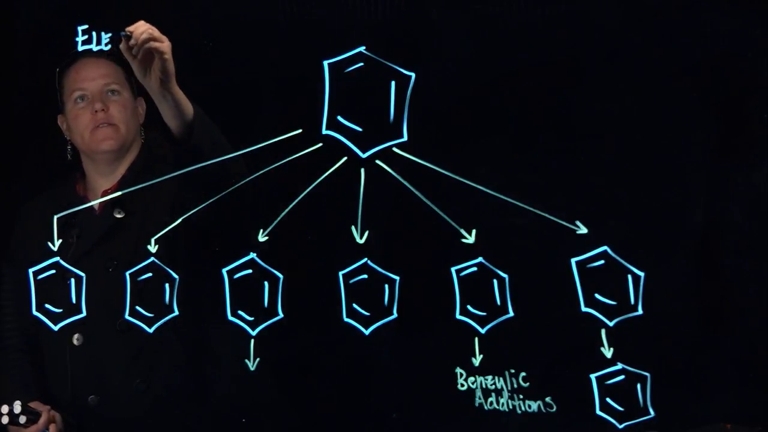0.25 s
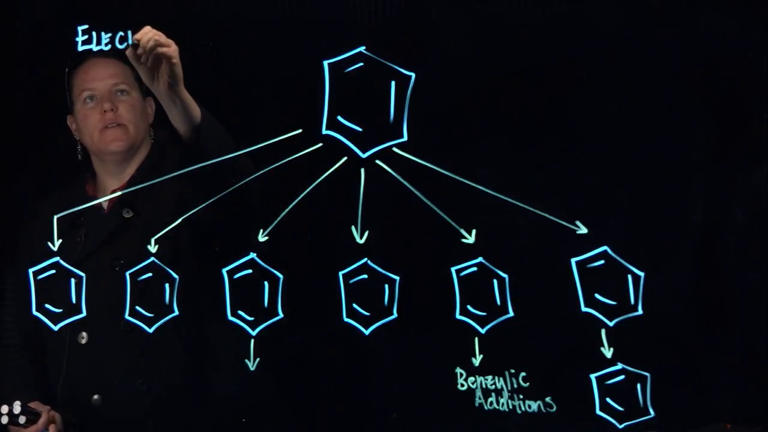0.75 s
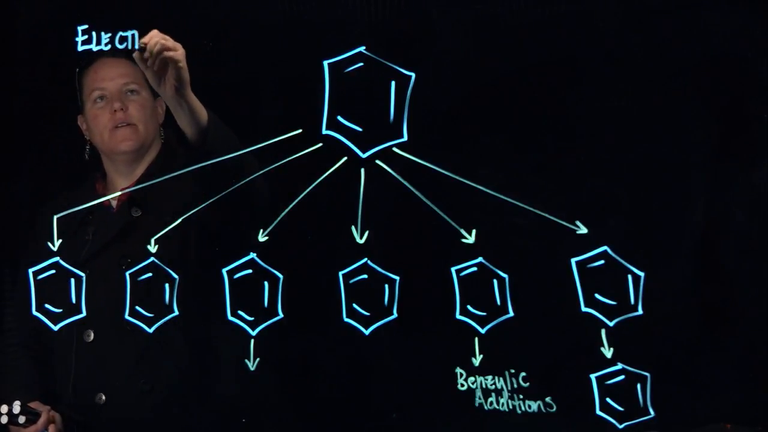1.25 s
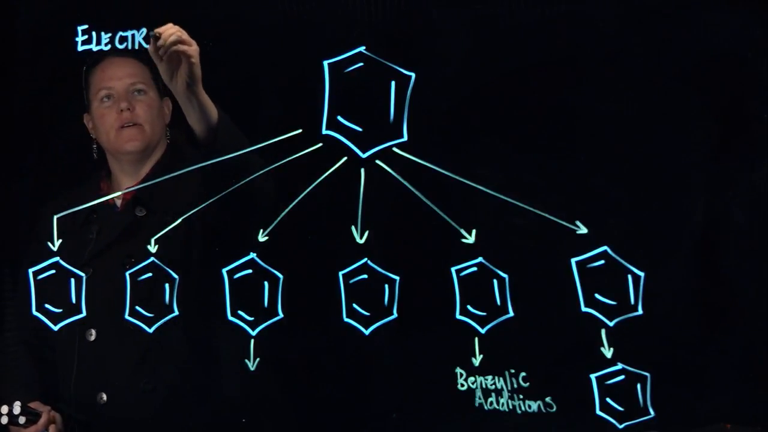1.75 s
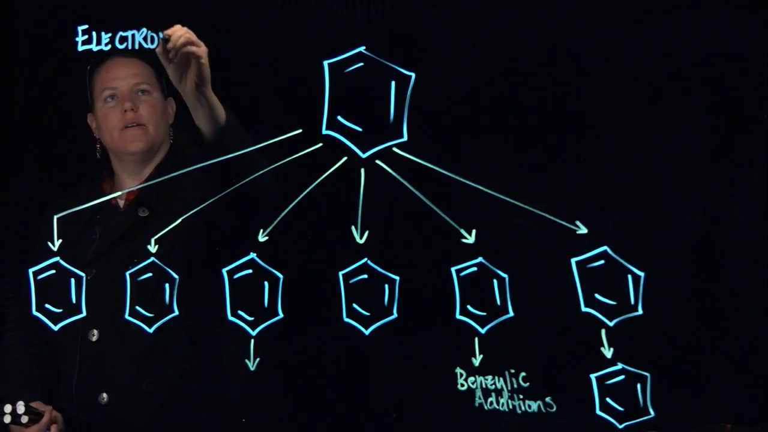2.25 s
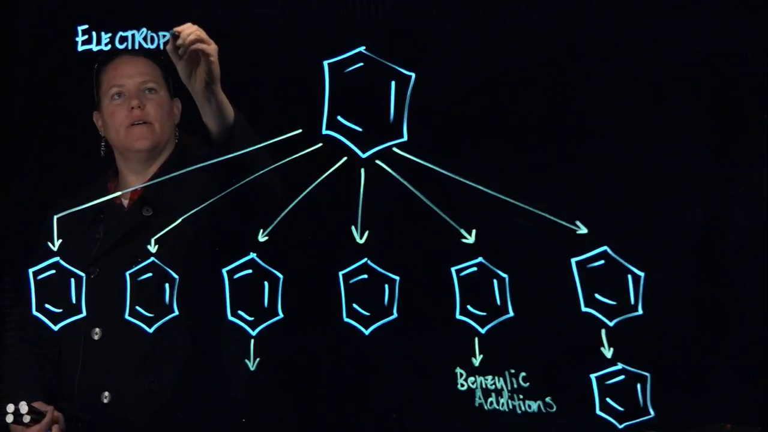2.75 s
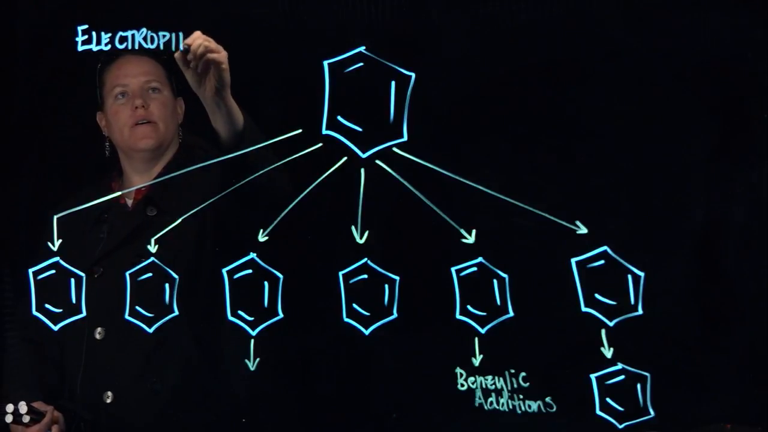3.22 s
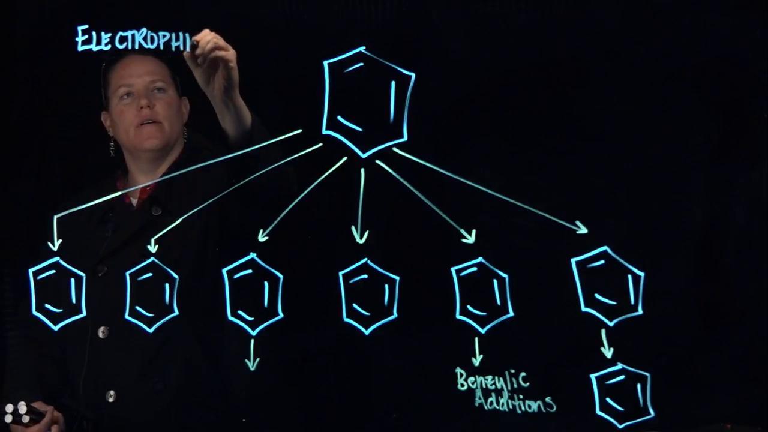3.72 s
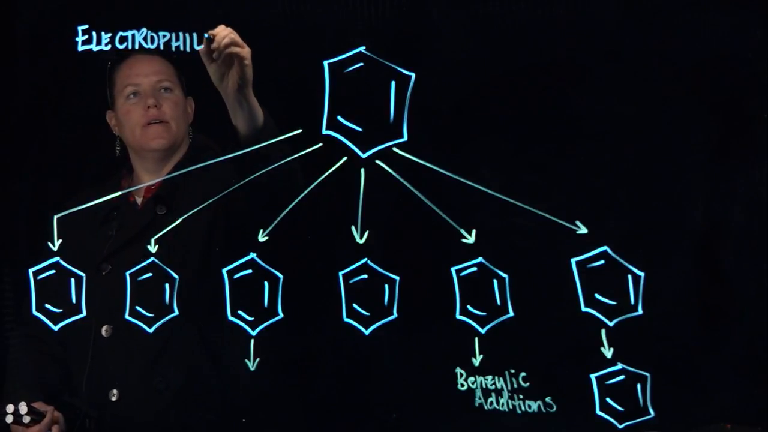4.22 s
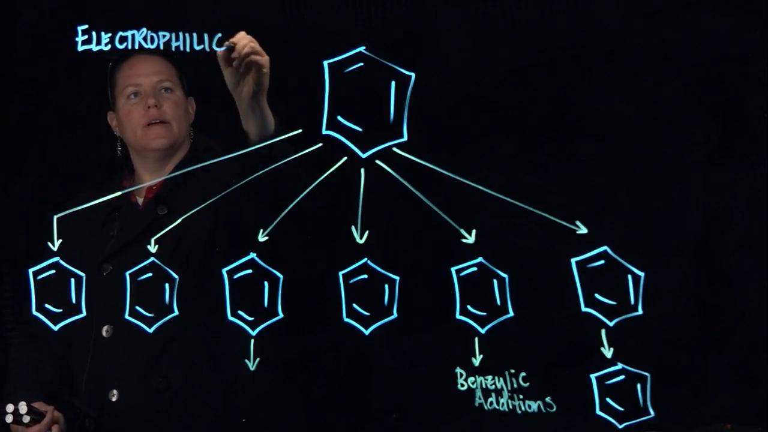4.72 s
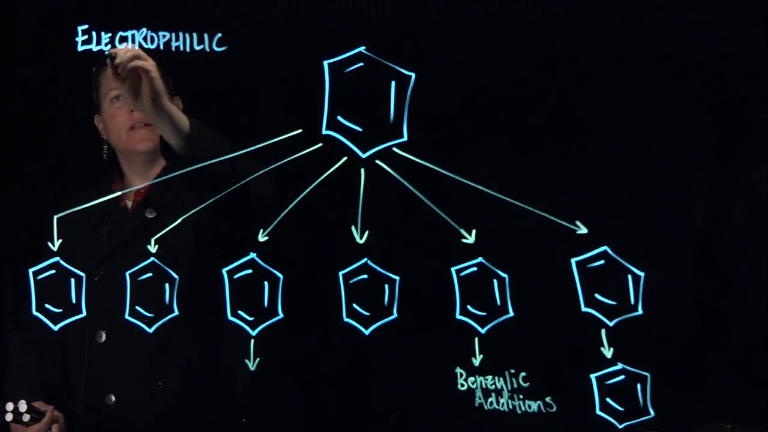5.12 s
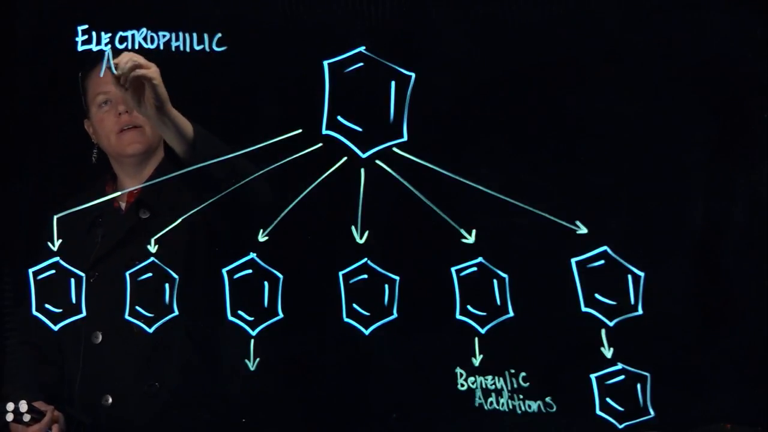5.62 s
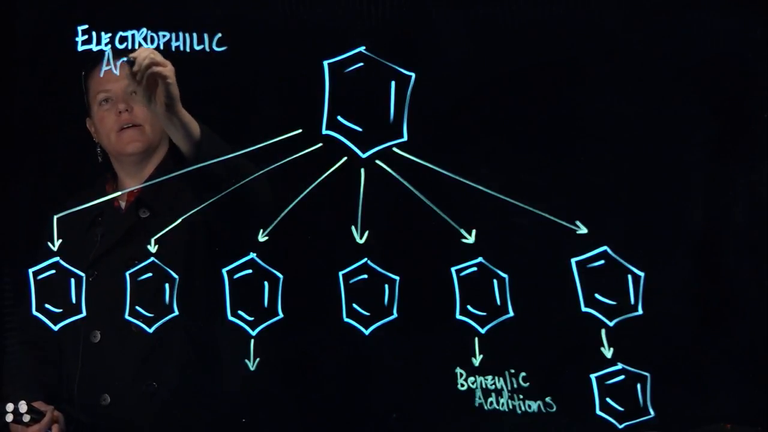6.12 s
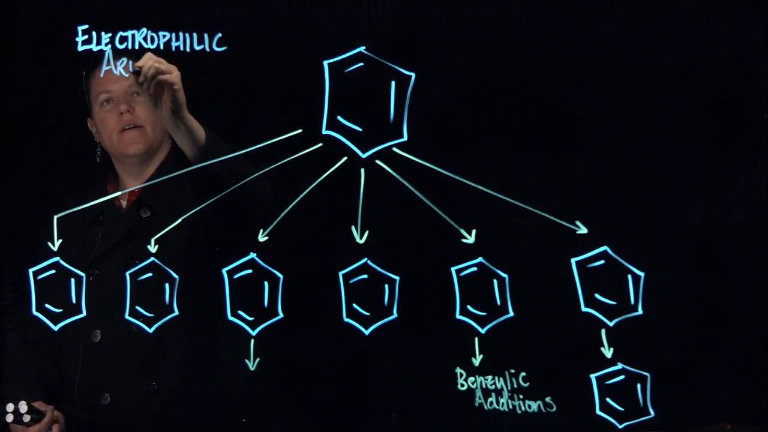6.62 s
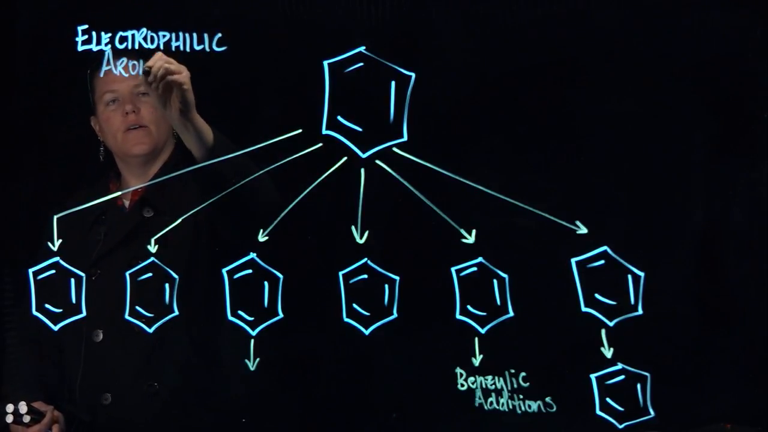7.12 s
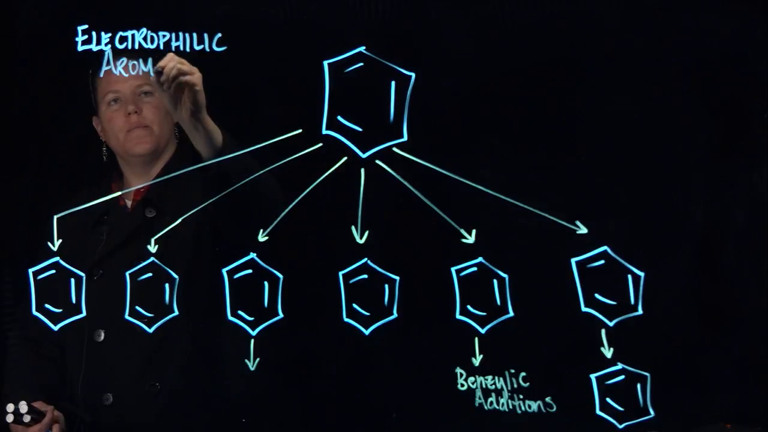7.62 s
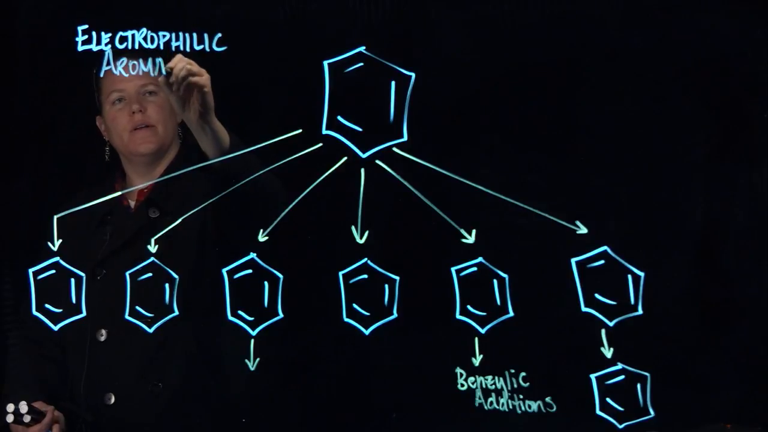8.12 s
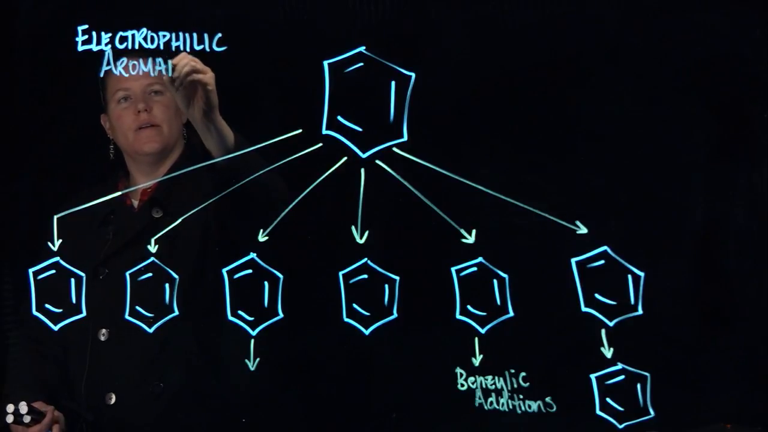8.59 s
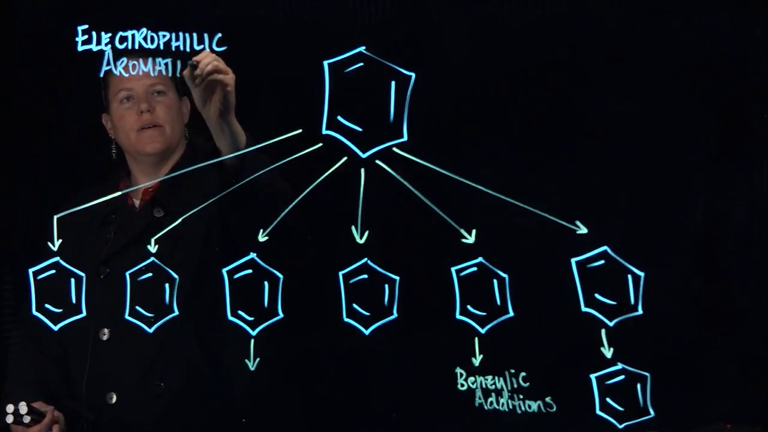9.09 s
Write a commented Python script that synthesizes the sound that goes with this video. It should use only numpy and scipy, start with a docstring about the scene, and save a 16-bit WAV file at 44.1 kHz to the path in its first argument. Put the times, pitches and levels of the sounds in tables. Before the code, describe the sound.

A low ventilation hum with deep rumble and faint air hiss runs throughout, swelling gently and somewhat stronger in the second half. Close by, in a small damped room, a felt marker writes on glass. A light tick at 0.1 s is followed by a soft squeak at 0.5 s with a faint sleeve rustle, then quiet taps and rubs. Two short squeaks chirp around 1.9-2.0 s. Soft brushing strokes follow, with crisp ticks at 3.4 and 3.6 s. At 4.6 s a squeak swells loudly; between 5.2 and 5.4 s come the loudest, very high, piercing squeals, breaking briefly into a rougher, lower chirp. A weaker squeak follows at 5.5 s. Ticks and rubs continue, squeaking again at 6.7-6.8 and 7.4 s. Scratchy strokes grow denser, with a clear tick and tiny squeak near 8.7 s, ending on quick rubs around 9.3 s.

```python
"""A felt marker writes capital letters on a glass board, heard close in a small, damped room.
The felt rubs with a soft hiss that stirs the nib's resonance; on some strokes the nib sticks, slips and squeaks,
mostly near 4 or 9 kHz, with half-order lines where the slips are uneven. Landings tick: pen modes, felt crack
and a knock on the pane. A sleeve rustles as shaped noise. Behind it all the ventilation hums, rumbles and
hisses as coloured noise, over a faint whine; the room adds a weak tail and the recorder cuts the top."""
import sys
import numpy as np
from scipy import signal
from scipy.fft import rfft, irfft
from scipy.io import wavfile
from scipy.ndimage import map_coordinates

SR = 44100
rng = np.random.default_rng(int(sys.argv[2]) if len(sys.argv) > 2 else 0)


def to_wav(s):
    """Save 16-bit WAV."""
    ch = np.atleast_2d(s).T  # columns
    pcm = np.round(np.clip(ch, -1, 1) * 32767)  # PCM
    wavfile.write(sys.argv[1], SR, pcm.astype(np.int16))


N = 412335
T = np.arange(N) / SR
FREQS = np.maximum(np.arange(N // 2 + 1) * SR / N, 1)  # Hz, kept above zero for the logarithm


def undb(db):
    """Decibels to gain."""
    return 10 ** (np.asarray(db) / 20)


def unit(x):
    """Scale to rms 1."""
    return x / np.sqrt(np.mean(x ** 2) + 1e-20)


def noise(colour, modes=()):
    """Noise of rms 1 with a (f/Hz, level/dB) colour, lifted at some resonances."""
    hz, db = np.transpose(colour)
    shape_db = np.interp(np.log(FREQS), np.log(hz), db)
    for centre_hz, width_hz, lift_db in modes:
        shape_db = shape_db + lift_db / (1 + (2 * (FREQS - centre_hz) / width_hz) ** 2)
    spectrum = rfft(rng.standard_normal(N)) * undb(shape_db)
    return unit(irfft(spectrum, N))


def walk(rate_hz, size):
    """Random wander of spread about 1 that takes a new value rate_hz times a second."""
    place = np.arange(size) * rate_hz / SR
    values = rng.standard_normal(size // 4 + 8)
    # straight lines between the values narrow the spread; the root restores it
    return map_coordinates(values, [place], order=1, mode="wrap") * np.sqrt(3 / 2)


def span(start, end):
    """Times of the samples between two moments, at least two of them."""
    first = int(start * SR)
    return np.arange(first, max(int(end * SR), first + 2)) / SR


def fade(t, edge_s):
    """Gate with rounded ends."""
    to_nearest_end = np.minimum(t - t[0], t[-1] - t)
    return np.sin(np.pi / 2 * np.clip(to_nearest_end / edge_s, 0, 1))


def add(out, start, sound):
    """Mix a sound in at a time."""
    i = max(int(start * SR), 0)
    out[i:i + len(sound)] += sound[:max(N - i, 0)]


# Colour of the duct hum before the room modes lift it: f/Hz, relative level/dB
HUM_COLOUR = [(60, -11), (95, -7), (135, -3), (200, -8.5), (310, -23), (460, -20.5), (620, -28),
              (1000, -34.5), (1500, -38), (2600, -48.5), (6000, -69.5)]
# Low modes of the small room: f/Hz, width/Hz, lift/dB
LOW_MODES = [(101, 4.2, 4.5), (132.3, 19, 8), (145.8, 15, -5.5), (167.4, 5.7, 8), (218, 6.5, 3),
             (255.3, 8.8, 7), (392, 12, 6.5), (459, 5.5, 3), (474.6, 16, 4.5)]
# Colour of the rumble under the hum: f/Hz, relative level/dB
RUMBLE_COLOUR = [(15, -5), (33, 4.5), (46, -5), (64, 3), (88, -11), (130, -20.5), (250, -33), (1000, -73.5)]
# Colour of the thin air hiss: f/Hz, relative level/dB
AIR_COLOUR = [(1000, -11), (3000, 3), (6000, 1), (10000, -0.5), (15500, -1)]
# Slow swells of the hum: t/s, rms level/dB
HUM_SWELLS = [(0.0, -32), (0.6, -33.5), (0.84, -40), (1.26, -35.5), (1.44, -36.5), (1.56, -34),
              (1.8, -37.5), (1.98, -34), (3.19, -36.0), (4.21, -31), (4.51, -35.5), (4.63, -29.5),
              (5.36, -28.5), (5.6, -33.5), (6.2, -30.5), (6.44, -26.5), (7.11, -33), (7.35, -28.5),
              (8.19, -34), (8.73, -29), (9.34, -32)]
HUM_USUAL_DB = -32.5  # level about which the hum swells
WHINE_HZ, WHINE_DB = 14002, -82  # rms level


def ventilation(rumble_db=-33.5, rumble_share=0.8, air_db=-60.0, air_share=0.79, air_rise_db_per_s=0.06):
    """Duct noise fills the room's low modes; rumble and a growing hiss share its swells; a whine is steady."""
    hum_db = np.interp(T, *np.transpose(HUM_SWELLS))
    swell_db = hum_db - HUM_USUAL_DB
    hum = undb(hum_db) * noise(HUM_COLOUR, LOW_MODES)
    rumble = undb(rumble_db + rumble_share * swell_db) * noise(RUMBLE_COLOUR)
    growth_db = air_rise_db_per_s * (T - T.mean())
    air = undb(air_db + air_share * swell_db + growth_db) * noise(AIR_COLOUR)
    whine = undb(WHINE_DB) * np.sqrt(2) * np.sin(2 * np.pi * WHINE_HZ * T)
    return hum + rumble + air + whine


ROOM_T60_S, ROOM_DB = 0.21, -26.5  # tail energy relative to the direct sound


def room(x, first_s=0.0044):
    """A damped room returns a weak, short tail of diffuse reflections behind the close direct sound."""
    t = np.arange(SR // 2) / SR
    tail = rng.standard_normal(len(t)) * undb(-60 * t / ROOM_T60_S) * (t > first_s)
    tail = tail / np.linalg.norm(tail)
    return x + undb(ROOM_DB) * signal.fftconvolve(x, tail)[:N]


# Sleeve rustles: start t/s, end t/s, level/dB
RUSTLE_TIMES = [(0.465, 0.625, -52), (1.203, 1.244, -46.5), (1.292, 1.338, -54), (1.534, 1.596, -59.5),
                (1.92, 2.052, -51), (4.63, 4.75, -57)]
# Colour of the rustling cloth: f/Hz, relative level/dB
CLOTH_COLOUR = [(200, -11), (500, 4), (900, 1), (1600, -1), (3000, -13), (6000, -29), (14000, -35)]


def sleeve(grain_db=2.0, crease_hz=260, edge_s=0.0051):
    """Cloth rustles unevenly as the arm moves, crease by crease."""
    motion = np.zeros(N)
    for start, end, db in RUSTLE_TIMES:
        add(motion, start, undb(db) * fade(span(start, end), edge_s))
    creases = unit(undb(grain_db * walk(crease_hz, size=N)))
    return motion * creases * noise(CLOTH_COLOUR)


# Colour of felt on glass, for cracks, rubbing and scrapes alike: f/Hz, relative level/dB
FELT_COLOUR = [(1000, 0.5), (3000, -12), (4200, -2), (5000, -4.5), (5700, -1), (7300, -5), (9000, 0.5),
               (10400, 1), (11200, -7.5), (12700, -6.5), (15500, -18.5)]
# Nib landings: t/s, peak level of the pen's ring/dB, dull knock relative level before pane_db/dB,
# crack of the felt relative level/dB
LANDINGS = [(.106, -34, -2, -23), (.608, -37.5, 11.5, -28), (0.732, -49.5, 13, -16), (.991, -49, 7, -14),
            (1.21, -40.5, 7, -14), (1.29, -45, 11.5, -14), (3.351, -41, -14, -16), (3.641, -29.5, -18, -6),
            (4.356, -33.5, -8, -17), (5.706, -30, -15, -19), (5.726, -42, 6, -16), (5.935, -41, -16, 2),
            (6.072, -34, -13, -5), (7.554, -31.5, -16, -3.5), (7.915, -42, 10.5, -18),
            (8.234, -43, -11, -16), (8.317, -46, 16, -20), (8.678, -27, -18, -22), (8.899, -39, 3.5, -14)]
# What a landing rings with: f/Hz before the grip shifts it, relative level/dB, t60/s
PEN_RING = [(3350, -6, .007), (4200, 8, .009), (4740, 9, 0.0055), (5340, 6, 0.0097), (6040, -9, .006),
            (7330, -5, 0.0057), (9800, -8, .004)]
# Colour of the dull knock on the pane: f/Hz, relative level/dB
KNOCK_COLOUR = [(150, 8), (500, 11), (900, 0), (2000, -15.5), (4000, -36), (10000, -57)]
KNOCK_T60_S, CRACK_T60_S = .022, .008


def ticks(pane_db=3, detune=0.018):
    """The landing nib rings the pen briefly, cracks the felt and knocks the pane."""
    out, t = np.zeros(N), np.arange(SR // 10) / SR
    knock_noise, crack_noise = noise(KNOCK_COLOUR), noise(FELT_COLOUR)
    for start, db, knock_db, crack_db in LANDINGS:
        i = rng.integers(N - len(t))
        grip = 1 + detune * rng.standard_normal(len(PEN_RING))  # the fingers shift the modes a little
        pen = np.zeros(len(t))
        for (hz, mode_db, t60), shift in zip(PEN_RING, grip):
            pen += undb(mode_db - 60 * t / t60) * np.sin(2 * np.pi * hz * shift * t)
        pen = pen / np.abs(pen).max()
        crack = crack_noise[i:i + len(t)] * undb(crack_db - 60 * t / CRACK_T60_S)
        pane = knock_noise[i:i + len(t)] * undb(-60 * t / KNOCK_T60_S)
        pane = undb(knock_db + pane_db) * pane / np.abs(pane).max()
        add(out, start, undb(db) * (pen + crack + pane))
    return out


# Pen strokes: start t/s, end t/s, hiss level/dB, nib resonance f/Hz before the speed bends it,
# its glide along the stroke/Hz, nib resonance rms level/dB
PEN_STROKES = [(0.432, .58, -69, 4100, 150, -65), (0.76, 0.834, -67, 3930, -300, -70),
               (1.015, 1.065, -62.5, 4200, 200, -67), (1.155, 1.23, -63, 4060, 0, -73),
               (1.426, 1.515, -60, 3800, -450, -62.5), (1.858, 1.965, -62.5, 4000, -100, -65),
               (1.986, 2.047, -58, 3770, 0, -66), (2.272, 2.355, -58, 4220, 0, -76),
               (2.537, 2.583, -55.5, 4290, -100, -59), (2.613, 2.688, -59.5, 3900, -150, -62),
               (2.843, 2.942, -58, 4000, 0, -80), (3.374, 3.435, -62, 4040, -250, -64),
               (3.572, 3.647, -60, 4190, 0, -69), (3.628, 3.665, -52, 3960, -250, -48),
               (3.852, 3.963, -62, 4200, -200, -65), (4.252, 4.363, -58, 4220, -280, -56),
               (4.683, 4.715, -49.5, 4080, 1, -60), (5.15, 5.226, -57, 4060, 0, -77),
               (5.304, 5.533, -54, 4150, 300.5, -71), (5.723, 5.771, -57, 4380, 0, -72),
               (5.897, 5.975, -57.5, 4120, -0.5, -76), (6.03, 6.156, -54.5, 3950, -1, -69),
               (6.172, 6.254, -59.5, 3820, -300, -56.5), (6.312, 6.4, -66, 4200, 100.5, -64),
               (6.588, 6.688, -60.5, 4060, 0, -73), (6.724, 6.869, -52.5, 3700, -200, -52.5),
               (7.006, 7.094, -58, 4060, -250, -67.5), (7.138, 7.19, -59, 3830, 0, -69),
               (7.26, 7.366, -62.5, 4160, -300, -64.5), (7.404, 7.47, -50, 3690, -200, -51),
               (7.497, 7.608, -54, 4120, -300, -57), (7.751, 7.855, -52.5, 4150, -300, -59.5),
               (7.882, 7.973, -57, 4050, 1, -75), (8.016, 8.105, -53.5, 4200, -300, -61.5),
               (8.266, 8.318, -61.5, 4220, -300, -62), (8.458, 8.548, -54.5, 4240, -350, -57.5),
               (8.71, 8.756, -54, 4100, 200, -62), (8.917, 9.016, -52.5, 4170, 0, -58.5),
               (9.194, 9.258, -51.5, 3900, 200, -55), (9.254, 9.305, -53.5, 4120, 150, -52),
               (9.297, 9.355, -53, 4240, 200, -55)]


def rubbing(grain_db=2.0, catch_db=3.0, nib_width_hz=340, bend=.025, edge_s=0.011, arch=.4):
    """Felt fibres catch on glass and hiss; they stir a nib resonance that rises with speed and glides."""
    pressure, ring = np.zeros(N), np.zeros(N)
    for start, end, db, hz, glide_hz, ring_db in PEN_STROKES:
        t = span(start, end)
        speed = fade(t, (t[-1] - t[0]) / 2)  # fastest at mid-stroke
        add(pressure, start, undb(db) * fade(t, edge_s) * (1 + arch * (speed - 1)))
        speed_bend = bend * (speed - np.sqrt(3) / 2)
        glide = glide_hz / hz * np.linspace(-.5, .5, len(t))
        phase = 2 * np.pi * np.cumsum(hz * (1 + speed_bend + glide)) / SR
        # two slow wanders on a carrier make a narrow band of noise
        stir = walk(nib_width_hz, size=len(t)) * np.cos(phase)
        stir += walk(nib_width_hz, size=len(t)) * np.sin(phase)
        add(ring, start, undb(ring_db) * unit(stir * speed))
    fibres_db = grain_db * walk(700, size=N) + catch_db * walk(90, size=N)
    hiss = pressure * unit(undb(fibres_db)) * noise(FELT_COLOUR)
    return hiss + ring


SQUEAK_EDGE_DB = 27.5  # a squeak grows from, and dies to, this far under its held level
PURE_ABOVE_DB, PURE_SLOPE = -12.5, 3.6  # above this level the 2nd harmonic gives way, in dB per dB
MELLOW_DB = 12.5  # fade of the 2nd harmonic over the second half of a squeak
UNEVEN_DB = 19  # growth of the half-order lines from start to end
OVERTONE_LAG = .5  # in attack and release the overtones drop this many dB more for each dB of level


def squeak(row, felt, jitter=0.0033, shimmer_db=1.54, scrape_db=-19, scrape_share=0.31, fourth_db=-18,
           half_db=(-17, -6, 0, -13)):
    """The nib sticks and slips; when every second slip differs, lines appear between the harmonics."""
    (start, end, attack_s, release_s, level_db, swell_db,
     mid_hz, glide_hz, arch_hz, second, third, halves) = row
    t = span(start, end)
    along = np.linspace(-.5, .5, len(t))
    rise = np.clip(1 - (t - t[0]) / max(attack_s, 1 / SR), 0, 1)
    fall = np.clip(1 - (t[-1] - t) / max(release_s, 1 / SR), 0, 1)
    held_db = level_db + swell_db * along
    edge_db = -SQUEAK_EDGE_DB * (rise ** 2 + fall ** 2)
    slip_hz = mid_hz + glide_hz * along - arch_hz * (2 * along) ** 2

    # overtone levels relative to the fundamental, in dB
    second = second - PURE_SLOPE * np.maximum(held_db - PURE_ABOVE_DB, 0)
    second = second - MELLOW_DB * np.maximum(2 * along, 0) ** 2
    halves = halves + UNEVEN_DB * along
    second, third, halves = (lift + OVERTONE_LAG * edge_db for lift in (second, third, halves))
    partials = [(1, 0), (2, second), (3, third), (4, third + fourth_db)]
    partials += [(k + .5, halves + lift) for k, lift in enumerate(half_db)]

    phase = 2 * np.pi * np.cumsum(slip_hz * (1 + jitter * walk(500, size=len(t)))) / SR
    tone = np.zeros(len(t))
    for order, lift in partials:
        tone += undb(lift) * np.sin(order * phase) * (order * slip_hz < SR / 2)
    # even slipping whistles cleanly; uneven slipping also scrapes
    scrape = undb(scrape_db + scrape_share * halves) * felt[:len(t)]
    level = undb(held_db + edge_db + shimmer_db * walk(300, size=len(t)))
    return (tone + scrape) * level * fade(t, 0.0013)


# Squeaks: start t/s, end t/s, attack/s, release/s, level of the fundamental at mid-squeak/dB,
# swell from start to end/dB, slip rate at mid-squeak f/Hz, glide from start to end/Hz,
# arch of the middle over the ends/Hz; then relative levels before they vary along the squeak:
# 2nd harmonic/dB, 3rd harmonic/dB, half-order lines/dB
SINGING_STROKES = [ (0.483, 0.549, 0.033, .028, -26.5, 2, 4137, 53, 80, -7, -32, -62),
                   (1.924, 1.975, 0.014, 0.025, -28, -1, 4020, -150, 5, -0.5, -14, -45),
                   (1.992, 2.038, 0.01, 0.023, -17.5, -2, 3775, 78, -18, -7.5, -14.5, -30),
                   (2.538, 2.585, .02, .022, -47, 0, 4330, -90, 0, -26, -40, -60),
                   (4.569, 4.611, 0.0098, 0.029, -21.5, 2.5, 3775, 301, -42, -6, -23, -24),
                   (4.613, 4.7, .027, .015, -14.5, 16.5, 4074, 90.5, 15, -2.5, -14, -60),
                   (5.213, 5.251, 0.019, 0.0016, -5.5, -2.5, 9310, -1800, -49.5, -60, -60, -65.5),
                   (5.2493, 5.261, 0.00071, 0.0018, -12, -2.5, 5400, -520, -190, -1.5, -25.5, -16),
                   (5.256, 5.265, 0.0011, 0.0021, -18, -1, 3586, 49, 0.5, -3.5, -9, -1.5),
                   (5.298, 5.32, .003, 0.01, -7.5, -3, 9520, 1547.5, -200, -60, -60, -59.5),
                   (5.365, 5.402, 0.0053, 0.011, -21, 9, 9230, -1650, 0, -60, -60, -60),
                   (5.514, 5.559, 0.026, 0.016, -23.5, -1, 4210, -430, 46, -7.5, -22, -59),
                   (6.67, 6.702, 0.018, .015, -33.5, 0, 4030, -140, 20, -14, -36, -60),
                   (6.735, 6.777, 0.0052, 0.012, -20, 3, 3785, -120, -39.5, -7, -13, -13.5),
                   (6.764, 6.802, .005, .003, -15, -20, 9610, 0, 649.5, -60, -60, -58.5),
                   (6.802, 6.86, .01, .014, -41.5, -11.5, 1910, 13.5, 13, 2.5, -3, -50),
                   (7.393, 7.429, 0.0045, 0.018, -22, -13, 3780, 330, 112, -8, -13.5, -14),
                   (8.719, 8.738, .011, 0.0092, -22, 0, 4160, 300, 30, -34, -45, -60)]


def squeaks():
    """All the strokes on which the nib sings, each with its own stretch of felt noise."""
    out, felt = np.zeros(N), noise(FELT_COLOUR)
    for row in SINGING_STROKES:
        add(out, row[0], squeak(row, np.roll(felt, rng.integers(N))))
    return out


def scene():
    """Close writing sounds with the room's tail, over the ventilation."""
    writing = squeaks() + rubbing() + ticks() + sleeve()
    return (room(writing) + ventilation())[None]


TOP_HZ = 15700


def record(dry):
    """The recorder cuts the top steeply."""
    low_pass = signal.ellip(12, .1, 80, TOP_HZ, fs=SR, output="sos")
    return signal.sosfilt(low_pass, dry)


dry = scene()
out = record(dry)
to_wav(out)
```